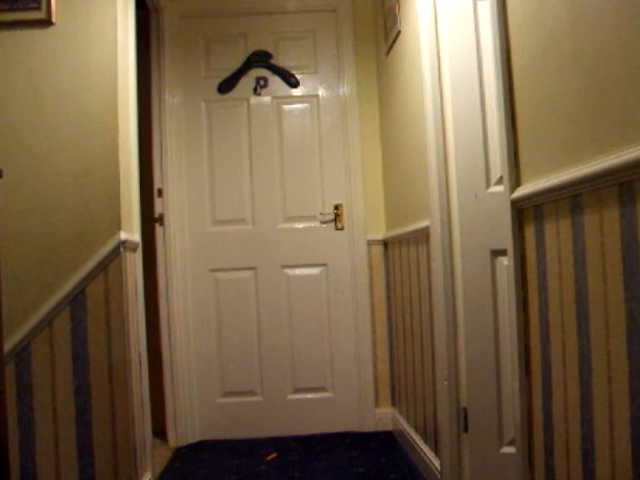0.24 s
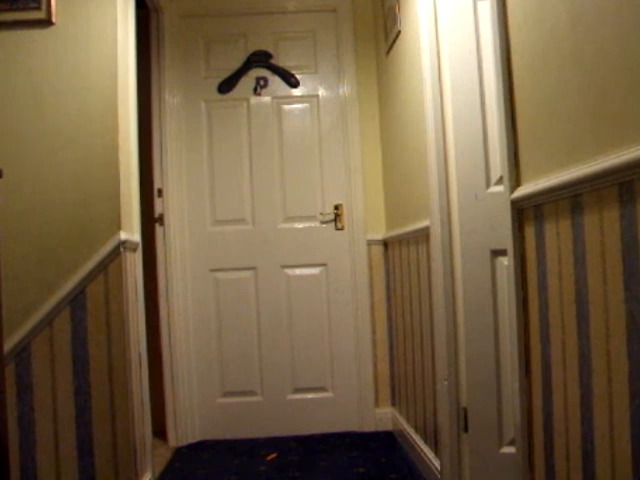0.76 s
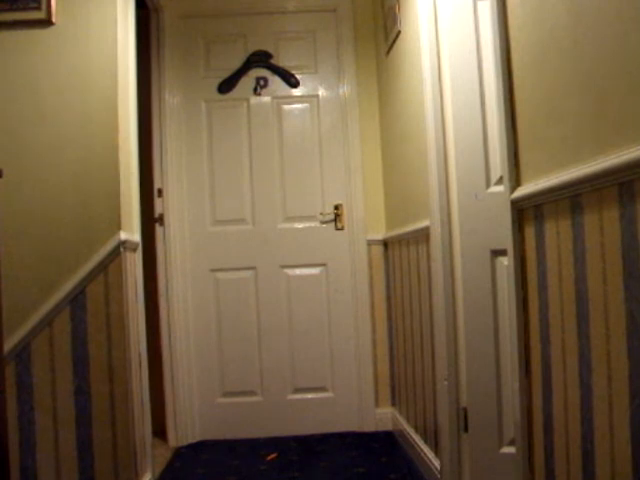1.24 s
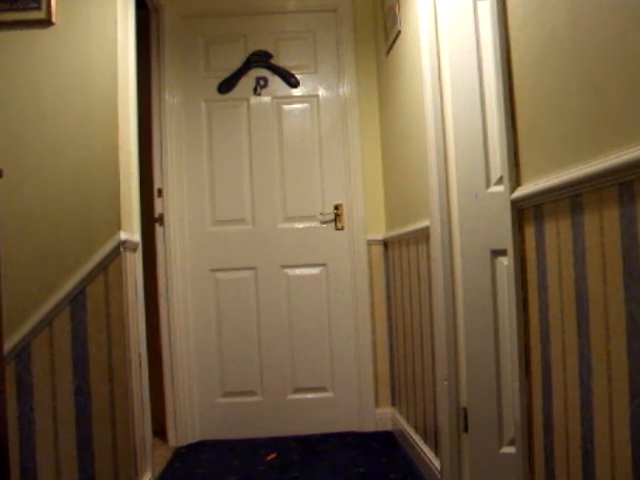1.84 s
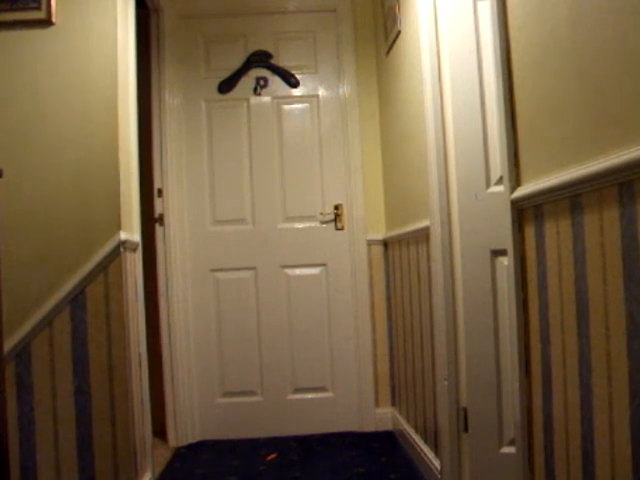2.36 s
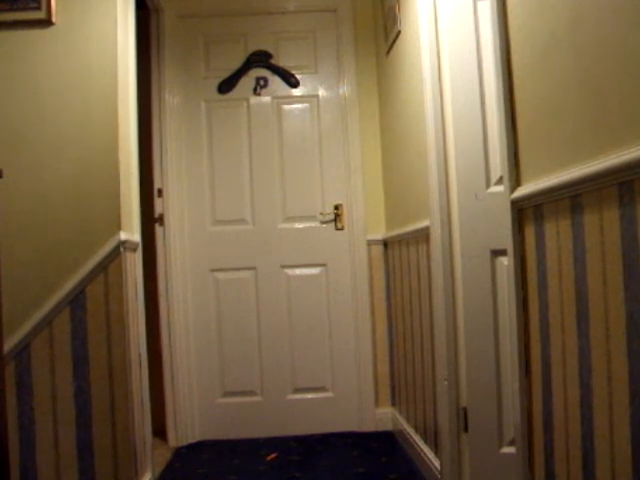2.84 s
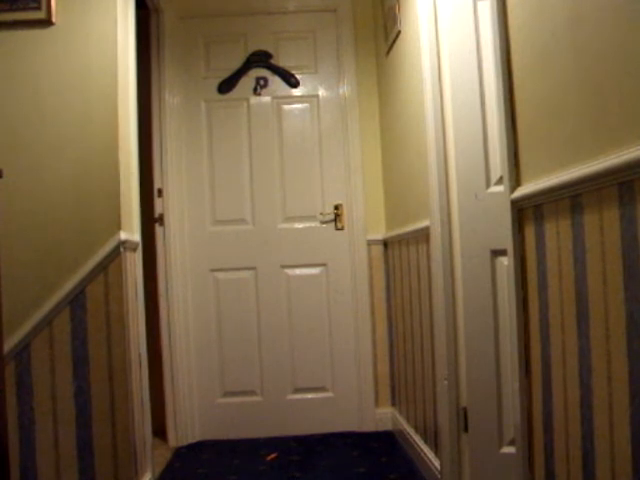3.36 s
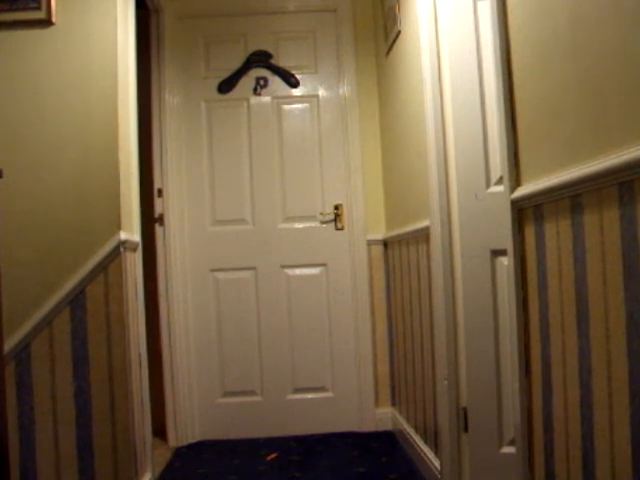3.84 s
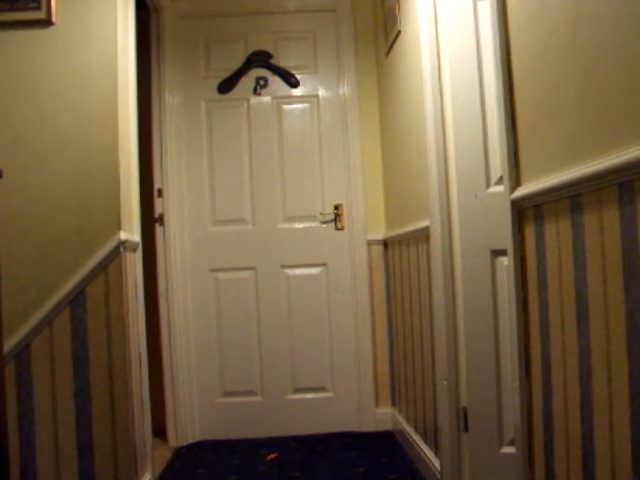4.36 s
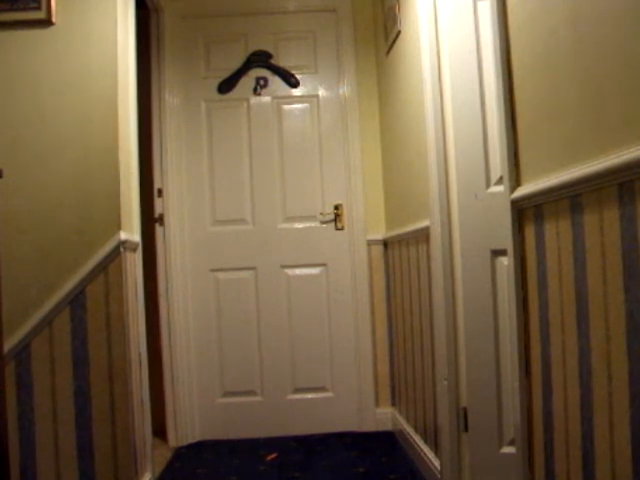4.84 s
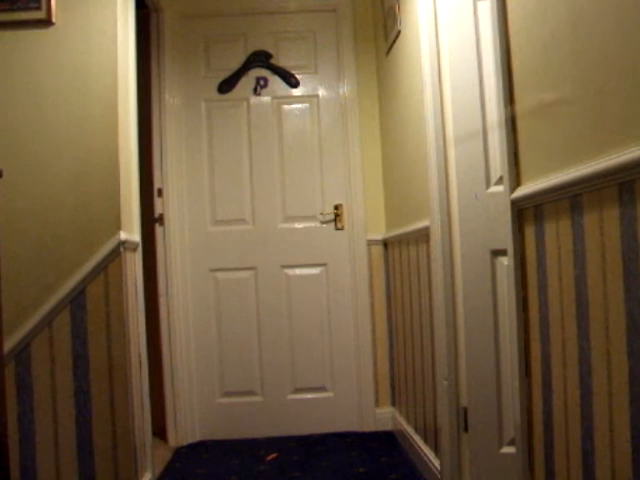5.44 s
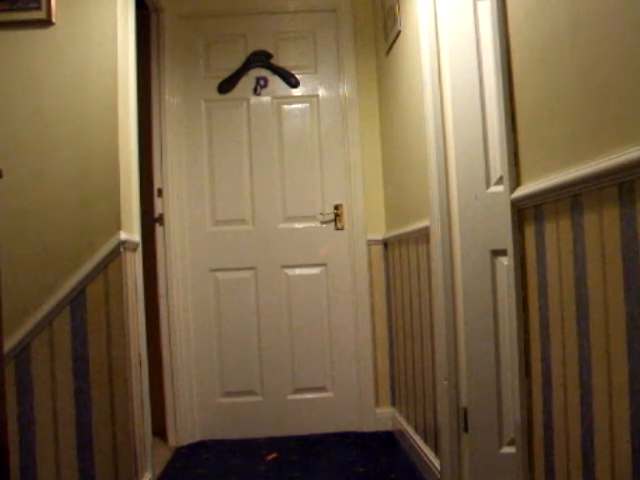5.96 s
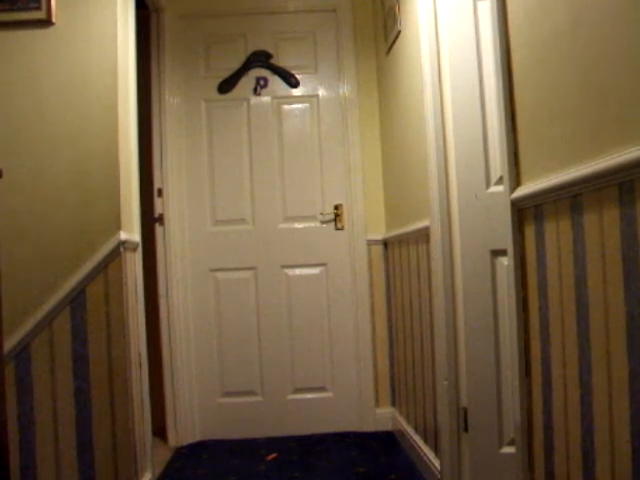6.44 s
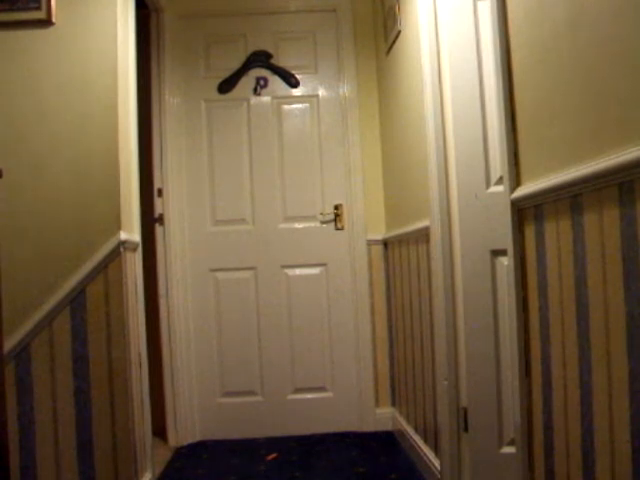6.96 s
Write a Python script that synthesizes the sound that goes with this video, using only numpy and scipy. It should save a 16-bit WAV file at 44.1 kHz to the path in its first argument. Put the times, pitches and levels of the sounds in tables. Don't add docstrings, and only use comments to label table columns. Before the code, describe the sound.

Constant grainy hiss, faint low hum and very weak high whine from a small, narrow-band microphone in a narrow hallway. Light plastic ticks and finger taps from 0 to 1.3 s, the clearest near 0.38 and 1.27. At 1.33 a loud, distorting double clack and hollow air thump; the background ducks. The dart knocks twice quickly on a hollow door at 1.59, then drops dully on carpet at 1.94. A click at 2.12; the slide scrapes back at 2.55-2.77 and forward at 2.85-2.93. Small clicks follow, then a shorter pull at 3.6 and a push with a tiny squeak at 3.91-3.97. Quiet fidgeting until the second shot at 5.48, door knock at 5.70 and rattles. A hard pull at 6.06-6.24, push at 6.27-6.36, a faint mid-pitched spring ringing on, and the third shot at 7.06, ending in short reverberation.

```python
import sys
import numpy as np
from scipy import signal
from scipy.fft import rfft, irfft
from scipy.io import wavfile

SR = 44100
rng = np.random.default_rng(int(sys.argv[2]) if len(sys.argv) > 2 else 0)


def volts_from_db(level):
    exponent = np.asarray(level, float) / 20
    return 10 ** exponent


def master(y):
    cut = np.clip(np.atleast_2d(y).T, -1, 1)
    pcm = np.round(cut * 32767)
    wavfile.write(sys.argv[1], SR, pcm.astype(np.int16))


N = 317079
T = np.arange(N) / SR

# pitch_hz, level_db, t60_s
SHELL_MODES = [(259, 4, 0.033), (490, 3, 0.0057), (621.7, -3, 0.064), (751, 6, 0.023), (1032, -6, 0.015),
               (1259, -6, 0.097), (1440, 3, 0.011), (1820, 6.5, 0.022), (2310, 2.5, 0.027),
               (2780, 10.5, 0.0047), (3600, -1, 0.023), (4340, 1, 0.005), (6840, -46, 0.023),
               (7570, 13, 0.01)]
# start_s, peak_db, rattle_ms, pitch_hz
DART_HITS = [
    (1.591, -6.5, 5.6, 765),
    (5.7014, -8.5, 2.7, 785),
]
BOUNCE_S = 0.021


def band(x, lo, hi, order=2):
    return signal.sosfilt(signal.butter(order, [lo, hi], "band", fs=SR, output="sos"), x)


def unit(x):
    return x / np.sqrt(np.mean(x ** 2))


def add(track, s, sound):
    i = int(s * SR)
    sound = sound[..., :max(N - i, 0)]
    track[..., i:i + sound.shape[-1]] += sound


def ring(modes, length, spread_db=0., detune=0.):
    hz, db, t60 = np.transpose(modes)[:, :, None]
    chance = rng.standard_normal((2, len(modes), 1))
    t = np.arange(int(length * SR)) / SR
    decay = 1000. ** (-t / t60)
    wave = np.sin(2 * np.pi * hz * (1 + detune * chance[0]) * t) * decay
    return np.sum(volts_from_db(db + spread_db * chance[1]) * wave, axis=0)


def contact(ms, size=2048):
    decay_s = abs(ms) * 0.0014 + 1e-4
    t = np.arange(size) / SR / decay_s
    return rng.standard_normal(size) * np.exp(-t) * np.minimum(t / 0.077, 1)


def knock(ms, modes, length):
    sound = signal.fftconvolve(contact(ms, size=12000), ring(modes, length))
    return sound / np.abs(sound).max()


def split(x):
    # low_hz, high_hz
    plastic_bands = [(300, 1000), (1000, 3500), (3500, 8500)]
    return np.array([(-1) ** k * band(x, lo, hi) for k, (lo, hi) in enumerate(plastic_bands)])


def duck_db(s):
    # start_s, depth_db, fall_s, recovery_s
    gain_dips = [
        (1.336, 20.5, 0.016, 0.14),
        (2.57, 5.5, 0.094, 0.035),
        (3.943, 4.5, 0.049, 0.068),
        (5.483, 19, 0.025, 0.14),
        (6.078, 17, 0.087, 0.19),
        (6.301, 7.5, 0.083, 0.054),
        (7.06, 13, 0.023, 0.1),
    ]
    curves = [0 * s]
    for start, depth_db, fall, back in gain_dips:
        curves.append(np.interp(s, [start, start + fall, start + fall + back], [0, -depth_db, 0]))
    return np.min(curves, axis=0)


def clack(ms, hz, ring_db):
    force = contact(ms)
    struck = ring(SHELL_MODES, .04, spread_db=0.5, detune=0.044) + ring([(hz, ring_db, 0.05)], .04)
    near = split(unit(force) + volts_from_db(-4.0) * unit(signal.fftconvolve(force, struck)[:2048]))
    near = near / np.abs(near).max(axis=1, keepdims=True)
    even = split(irfft(np.exp(1j * np.angle(rfft(force))), 2048))
    match = np.std(near, axis=1, keepdims=True) / np.std(even, axis=1, keepdims=True)
    return np.array([near, even * match])


def strike(track, s, db, low_db, high_db, ms, hz, ring_db=7.5):
    levels_db = db - 7.0 - duck_db(s) + np.array([low_db, 0, high_db])
    add(track, s, volts_from_db(levels_db) @ clack(ms, hz, ring_db))


def hiss():
    # frequency_hz, density_db (per Hz)
    noise_curve = [(15, -64), (25, -6.5), (96, -10), (120, -13.5), (152, -6.5), (208, -13.5), (240, -12),
                   (399, -8.5), (429, -6), (507, -6.5), (746, -9), (821, -11.5), (1180, -11), (2870, -14.5),
                   (7900, -14.5), (10300, -32.5), (17400, -120)]
    # pitch_hz, rms_db
    whine_tones = [(7854, -69), (7881, -70), (7822, -75)]
    hz, db = np.transpose(noise_curve)
    colour = volts_from_db(np.interp(np.log(np.fft.rfftfreq(N, 1 / SR) + 1), np.log(hz), db))
    noise = unit(irfft(rfft(rng.standard_normal(N)) * colour, N))
    hum_hz, width_hz = 234.8, 21.6
    hum = unit(band(rng.standard_normal(N), hum_hz - width_hz / 2, hum_hz + width_hz / 2))
    whine = sum(volts_from_db(db) * np.sqrt(2) * np.sin(2 * np.pi * hz * T) for hz, db in whine_tones)
    return volts_from_db(-49.5) * noise + volts_from_db(-63) * hum + whine


def finger_taps():
    # start_s, peak_db
    grip_taps = [(0.0601, -29), (0.0981, -31.5), (.693, -33.5), (0.8582, -33.5), (1.1287, -32),
                 (1.1772, -31), (1.2938, -26.5), (2.0902, -28.5), (2.1297, -21.5), (2.329, -30),
                 (2.4058, -26.5), (2.4482, -33), (2.4968, -27.5), (3.3458, -21.5), (3.394, -31),
                 (3.788, -25), (3.8668, -25.5), (4.4235, -34.5), (4.441, -35), (4.585, -35.5),
                 (4.604, -36.5), (4.635, -38), (5.0839, -35), (5.1863, -26), (5.8884, -20), (6.0102, -21.5),
                 (6.9308, -31.5)]
    out = np.zeros((2, N))
    for s, db in grip_taps:
        strike(out, s, db, low_db=-2, high_db=-20.5, ms=8, hz=619)
    return out


def hall(x):
    # centre_hz, level_db, t60_s
    hall_bands = [(93, 1.5, 0.21), (245, 1, 0.32), (604, 1, 0.35), (1700, -3, 0.35), (3000, -4, 0.28),
                  (7400, -2.5, 0.32)]
    t = np.arange(SR // 2) / SR
    tail = np.zeros(len(t))
    for hz, db, t60 in hall_bands:
        noise = band(rng.standard_normal(len(t)), hz / 1.6, hz * 1.48)
        tail += volts_from_db(db) * noise * 1000. ** (-t / t60)
    tail = tail * np.clip((t - .003) / 0.0056, 0, 1)
    return volts_from_db(-9.5) * signal.fftconvolve(x, tail / np.sqrt(np.sum(tail ** 2)))[:N]


def loose_ticks():
    # start_s, peak_db, lows_db, highs_db, pitch_hz
    tick_events = [(0.3313, -28.5, -24, -10, 1810), (.356, -35, -6, -16, 1850),
                   (0.3766, -18.5, -41, -11.5, 1230), (0.8007, -37, -4, 1, 2210),
                   (1.098, -32, -2, 2.5, 1890), (1.273, -17, -1.5, 0.5, 1740), (2.1186, -13, 0, -0.5, 1844),
                   (2.2313, -26, 2.5, -30, 1297), (3.1167, -19, -10, -1.5, 676),
                   (3.1315, -21, -3.5, -15, 980), (3.247, -34, -7, -19, 1260), (3.4694, -29, -6, -42, 1780),
                   (3.565, -30.5, -1, -25, 1680), (3.827, -29, -16, 0, 1010), (4.871, -37, -15, -10, 1240),
                   (5.436, -19, -6.5, -32, 617), (5.759, -11, -5.5, -16, 632), (5.8287, -21, -11, 0, 800),
                   (5.8708, -19.5, 5.5, -4.5, 782), (6.6617, -25.5, -11, -9, 1840),
                   (7.0056, -35.5, 5, -13, 1230)]
    out = np.zeros((2, N))
    for s, db, low_db, high_db, hz in tick_events:
        strike(out, s, db, low_db, high_db, ms=4.65, hz=hz, ring_db=15)
    return out


def shots():
    # catch_s, catch_peak_db, catch_highs_db, plunger_travel_s, slam_peak_db
    shot_events = [
        (1.3297, 0, 2, 0.012, 6),
        (5.4802, -6, 5, 0.012, 6.5),
        (7.0547, -5.5, 6, .0095, 5.5),
    ]
    # lows_db, highs_db, rattle_ms, pitch_hz
    chatter = (-4, 8, 10, 1748)
    slam = (-9, 4.5, 2.5, 1137)
    rebound = (-6.5, 12, 10.5, 1749.5)
    out = np.zeros((2, N))
    for s, db, high_db, travel, slam_db in shot_events:
        strike(out, s - 0.0028, db - 13.5, *chatter)
        strike(out, s, db, low_db=-4.5, high_db=high_db, ms=2.9, hz=700)
        strike(out, s + 0.006, -9.5, *chatter)
        strike(out, s + travel, slam_db, *slam)
        strike(out, s + travel + 0.0052, slam_db - 15.5, *rebound)
    return out


def air_thumps():
    # start_s, peak_db
    thump_events = [
        (1.3388, -1),
        (5.491, 2.5),
        (7.0644, -1.5),
    ]
    # pitch_hz, level_db, t60_s
    barrel_modes = [(413, 23.5, 0.031), (184, -34, 0.059), (70, -12.5, 0.029)]
    # pitch_hz, level_db, t60_s
    tube_modes = [(390, -43, .2), (404, -44, .3), (473, -47, .3)]
    out = np.zeros((2, N))
    thump = np.convolve(np.hanning(int(0.0019 * SR)), ring(barrel_modes, .06))
    thump = thump / np.abs(thump).max()
    send_db = np.array([[0], [-7]])
    for s, db in thump_events:
        add(out, s, -volts_from_db(db - duck_db(s) + send_db) * thump)
        add(out, s, volts_from_db(db - duck_db(s + 0.011)) * ring(tube_modes, .4, spread_db=-5.0, detune=0.023))
    return out


def dart_slaps():
    out = np.zeros((2, N))
    for s, db, ms, hz in DART_HITS:
        for late, change_db in ((0, 0), (BOUNCE_S, -5.)):
            strike(out, s + late, db + change_db, low_db=-3, high_db=6, ms=ms, hz=hz)
    return out


def door_panels():
    # pitch_hz, level_db, t60_s
    panel_modes = [
        [(170, -18, 0.098), (245, -10, 0.12), (329, -1, 0.057), (470, -5, 0.097), (621, -2.5, 0.17),
         (690, -6, .14), (666, -14, 0.39), (740, -23, .07), (800, -14, 0.096), (858, -6, 0.1)],
        [(215, -18, 0.073), (333, -21, 0.074), (473, -10, 0.1), (653, -7.5, 0.15), (710, -18, 0.057),
         (785, -.7, 0.064), (838, 4.5, 0.06), (900, -7, 0.036), (804, -15.5, 0.37), (1120, -4, 0.027)],
    ]
    panel_peaks = (-16, -6)
    out = np.zeros((2, N))
    for (s, *_), db, modes in zip(DART_HITS, panel_peaks, panel_modes):
        add(out, s, volts_from_db(db) * knock(8.1, modes, .4))
        add(out, s + BOUNCE_S, volts_from_db(db - 2) * knock(19.5, modes, .4))
    return out


def floor_bumps():
    # start_s, peak_db
    floor_jolts = [(1.597, -51), (2.629, -30), (2.677, -31.5), (2.929, -21.5), (3.967, -31.5), (5.708, -42),
                   (6.081, -25.5), (6.13, -39), (6.172, -24.5), (6.358, -26.5), (6.411, -54)]
    # pitch_hz, level_db, t60_s
    floor_modes = [(55, 5.5, 0.23), (87, 15, 0.031), (120, 3.8, 0.062), (187.0, 12.5, 0.072)]
    out = np.zeros((2, N))
    for s, db in floor_jolts:
        add(out, s, volts_from_db(db - duck_db(s)) * knock(9.2, floor_modes, .2))
    return out


def carpet_drops():
    # start_s, peak_db
    dart_drops = [
        (1.941, -35),
        (2.03, -49.5),
        (6.977, -55),
    ]
    # pitch_hz, level_db, t60_s
    carpet_modes = [(150, -5, .04), (205, 0, .05), (270, -2, .04)]
    out = np.zeros((2, N))
    for s, db in dart_drops:
        add(out, s, volts_from_db(db) * knock(15, carpet_modes, .15))
    return out


def slide_pulls():
    # start_s, peak_db, highs_db, pitch_hz
    pull_clicks = [(2.5409, -18, 9.5, 1830), (2.5575, -4, 1.5, 1090), (2.5737, -11.5, 7, 2280),
                   (2.5862, -6, 10, 4600), (2.6196, -13.5, -12, 1730), (2.6307, -2, 10.5, 4680),
                   (2.673, -0.5, -4, 1206), (2.7697, -13.5, -13, 710), (3.6029, -39, -2, 1330),
                   (3.6114, -17, -6.5, 686), (3.6236, -15, 16, 580), (6.0563, -18, 7.5, 2190),
                   (6.0715, -3.5, -1.5, 1890), (6.0921, -12, 16.5, 5650), (6.1146, -17, -12, 1770),
                   (6.1196, -7, -0.5, 1876), (6.1281, 0.5, 12.5, 1804), (6.1544, 3, -4.5, 1110),
                   (6.2367, -12.5, -7.5, 538)]
    out = np.zeros((2, N))
    for s, db, high_db, hz in pull_clicks:
        strike(out, s, db, low_db=-8.5, high_db=high_db, ms=1.58, hz=hz)
    return out


def slide_rub():
    # start_s, length_s, level_db, swell_db (over the stroke), highs_db
    rub_strokes = [
        (2.546, 0.068, -24, 7.2, 4.3),
        (2.836, 0.087, -17, 5, -7),
        (3.597, 0.055, -21.5, 1.2, -7.5),
        (3.869, 0.033, -43, 10, 2),
        (3.909, 0.06, -16.5, -5.5, -9),
        (6.065, 0.097, -13.5, -4.5, -0.5),
        (6.264, 0.086, -16.5, 2, -2.5),
    ]
    clicks_per_s = 5000
    clicks = rng.standard_normal(N) * (rng.random(N) < clicks_per_s / SR)
    clicks = clicks * volts_from_db(1.5 * rng.exponential(size=N))
    shell = signal.fftconvolve(clicks, ring(SHELL_MODES, .04))[:N]
    rub = split(unit(clicks) + volts_from_db(-7.) * unit(shell))
    low, middle, high = (unit(part) for part in rub)
    out = np.zeros(N)
    for s, length, db, swell_db, high_db in rub_strokes:
        fade = np.interp(T, [s, s + 0.0091, s + length, s + length + 0.019], [0, 1, 1, 0])
        swell = volts_from_db(db - 8.0 + swell_db * np.clip((T - s) / length, 0, 1))
        out += fade * swell * (volts_from_db(-6) * low + middle + volts_from_db(high_db) * high)
    return out * volts_from_db(-duck_db(T))


def slide_pushes():
    # start_s, peak_db, highs_db, pitch_hz
    push_clicks = [(2.8474, -31.5, 25, 1660), (2.8759, -2.5, -2.5, 582), (2.903, -9.5, -5.5, 2170),
                   (2.919, -4.5, 0, 580), (3.9139, -18, 4.5, 550), (3.9385, 1, -2, 544),
                   (3.9434, -24, 26, 1720), (3.9615, -7, -3, 560), (3.9678, -2.5, 9.5, 2130),
                   (6.2733, -14, 4.5, 1280), (6.2844, -5, -15, 1720), (6.3102, -1.5, -28.5, 590),
                   (6.3288, -10, 12.5, 537), (6.3535, -1.5, 5, 1850)]
    out = np.zeros((2, N))
    for s, db, high_db, hz in push_clicks:
        strike(out, s, db, low_db=-5.5, high_db=high_db, ms=3.9, hz=hz)
    return out


def slide_squeak():
    # start_s, length_s, pitch_hz
    squeak_event = (3.914, .028, 600)
    s, length, hz = squeak_event
    out = np.zeros((2, N))
    t = np.arange(int(length * SR)) / SR
    tone = np.sin(2 * np.pi * hz * t) + 0.5 * np.sin(4 * np.pi * hz * t)
    add(out, s, volts_from_db(-17) * np.sqrt(t / length) * tone)
    return out


def steel_spring():
    # pitch_hz, level_db, t60_s
    spring_modes = [(439, -36.5, 2.1)]
    out = np.zeros((2, N))
    add(out, 6.37, ring(spring_modes, 0.89))
    return out


def scene():
    clacks = finger_taps() + loose_ticks() + shots() + dart_slaps() + slide_pulls() + slide_pushes()
    thuds = air_thumps() + door_panels() + floor_bumps() + carpet_drops() + slide_squeak() + steel_spring()
    near, around = clacks + slide_rub() + band(thuds, 81, 4000)
    heard = signal.sosfilt(signal.butter(6, 8060, fs=SR, output="sos"), near + hall(around))
    return (heard + hiss())[None]


def band_limit(x):
    return signal.sosfilt(signal.butter(12, 8050, fs=SR, output="sos"), x)


def record(dry):
    x = np.clip(dry * volts_from_db(duck_db(T)), -1.3, 1.3)
    x = signal.sosfilt(signal.ellip(10, .5, 80, 7830, fs=SR, output="sos"), x)
    mix = np.clip(x - 0.0033, -1, 1)
    return band_limit(mix)


dry = scene()
out = record(dry)
master(out)
```